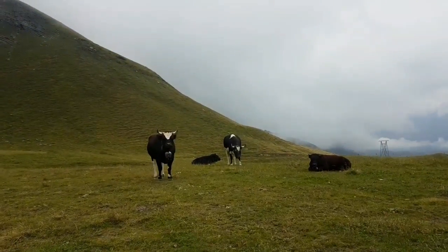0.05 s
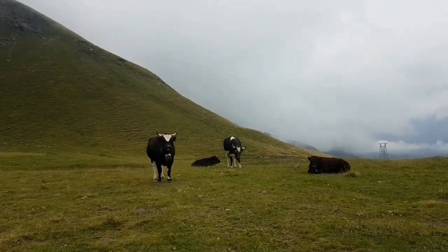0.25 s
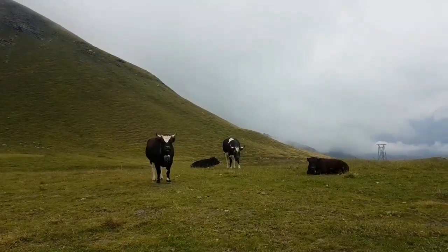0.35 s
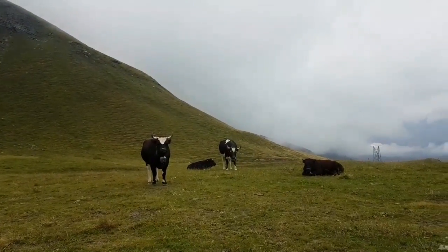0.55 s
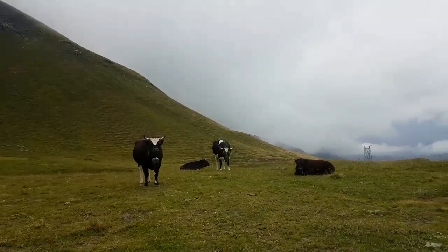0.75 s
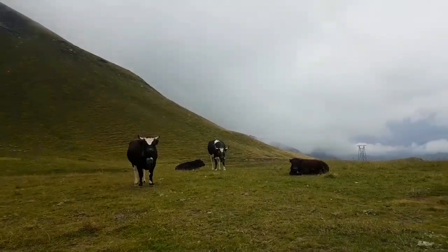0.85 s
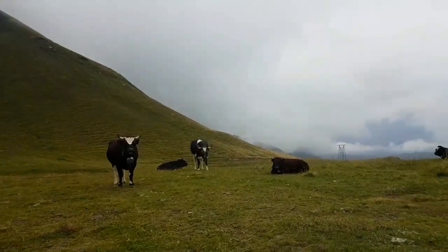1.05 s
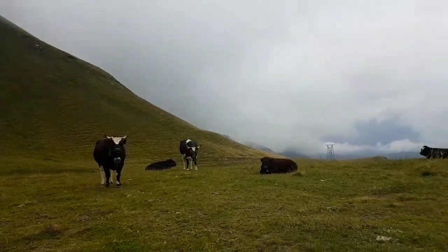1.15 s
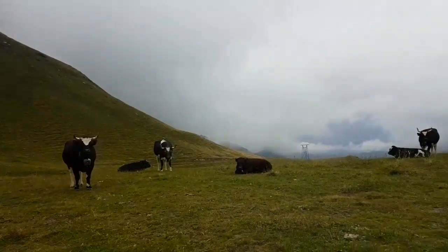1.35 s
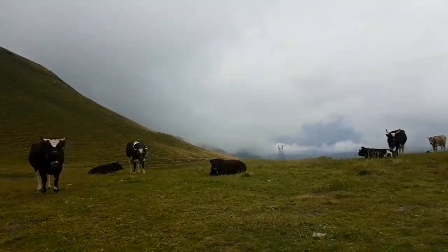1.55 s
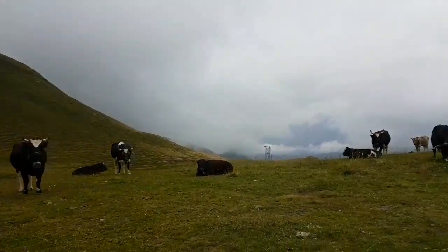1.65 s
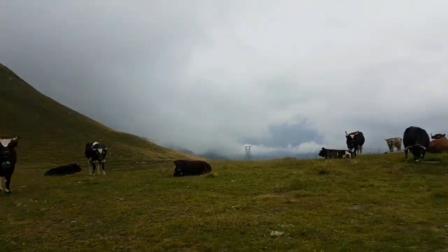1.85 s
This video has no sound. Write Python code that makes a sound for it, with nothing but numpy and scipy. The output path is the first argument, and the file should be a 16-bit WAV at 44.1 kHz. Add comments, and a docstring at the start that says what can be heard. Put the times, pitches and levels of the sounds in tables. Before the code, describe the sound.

Cowbells clank close by, a quick run then slower strokes, over light wind.

```python
"""A distant cowbell and a light wind rumbling on the microphone open a stereo scene on a mountain pasture.
Close by, a cow shakes her sheet-metal bell in a quick run of clanks; two more bells swing at a walking
pace and the herd answers from far off. Each clapper blow cracks against the wall and sets it ringing,
with close pairs of modes that beat and a shimmer of short high ones."""
import sys
import numpy as np
from scipy import signal
from scipy.fft import rfft, irfft
from scipy.io import wavfile

SR = 44100
rng = np.random.default_rng(int(sys.argv[2]) if len(sys.argv) > 2 else 0)


def log_audio(samples):
    """Write samples as a 16-bit WAV file to the path given in sys.argv[1]."""
    # one column per channel
    frames = np.atleast_2d(samples).T
    # limit to full scale, then quantise
    limited = np.clip(frames, -1, 1)
    pcm = np.round(limited * 32767).astype(np.int16)
    wavfile.write(sys.argv[1], SR, pcm)


N = 83790
T = np.arange(N) / SR
SWELL_CYCLES = 1.1  # time constant of a hum's build-up, in its own periods


def from_db(db):
    """Decibels to amplitude."""
    return 10 ** (np.asarray(db) / 20)


def at_hz(points, hz):
    """Reads a spectrum (f/Hz, level/dB) on a log-frequency axis."""
    points = np.array(points)
    return np.interp(np.log(hz), np.log(points[:, 0]), points[:, 1])


def noise(spectrum):
    """Coloured noise, unrelated in the two channels; rms 1."""
    gain = from_db(at_hz(spectrum, np.fft.rfftfreq(N, 1 / SR) + 1))
    x = irfft(rfft(rng.standard_normal((2, N))) * gain, N)
    return x / x.std()


def ring(times, sizes, hz, t60, pan_db, lag_s, swell_s=0):
    """One mode, each blow adding to its ring; the left channel is pan_db louder and lag_s later."""
    pole = (2j * np.pi * hz - np.log(1000) / max(t60, .01)) / SR
    at = np.clip(np.asarray(times) * SR, 0, N - 2)
    first = np.ceil(at).astype(int)
    blows = np.zeros(N, complex)
    blows[first] = sizes * np.exp(pole * (first - at))  # blows land between samples
    mode = signal.lfilter([1], [1, -np.exp(pole)], blows + 1e-18)
    if swell_s > 0:
        keep = np.exp(-1 / (swell_s * SR))
        for _ in range(2):  # the hum builds up smoothly as the air in the bell follows the wall
            mode = signal.lfilter([1 - keep], [1, -keep * np.exp(pole)], mode)
    left = from_db(pan_db / 2) * np.exp(-1j * np.pi * hz * lag_s)
    return np.array([(mode * left).imag, (mode / left).imag])


def far_bells(overtone_t60_s=.53, ting_t60_s=.18, ting_db=-9.5):
    """The herd far across the pasture: distance leaves each bell's hum, one overtone and a faint ting."""
    # blows: t/s, level/dB, hum f/Hz, hum t60/s, overtone f/Hz, overtone level/dB re hum
    blows = [(0, -39.5, 932, 0.21, 1820, -9), (.191, -32.5, 776, 0.17, 1975, -13),
             (0.66, -46, 982, 0.39, 943, -9.5), (.70, -37, 730, 0.07, 1975, -13),
             (.822, -43, 666.5, 0.36, 1842, -11), (1.002, -52, 982, 0.37, 967, 3),
             (1.253, -44, 661.5, 0.28, 1835, -1.5), (1.366, -46, 933, 0.075, 982, -15),
             (1.667, -43, 657, 0.5, 1810, -12), (1.725, -43, 793, 0.29, 1934, -4.5)]
    # upper modes as multiples of the hum
    ting_ratios = [3.2, 3.7, 7.3]
    out = 0
    for s, db, hz, t60, overtone_hz, overtone_db in blows:
        lag_s = rng.uniform(-0.00067, 0.00031)
        out += ring([s], from_db(db), hz, t60, 0, lag_s, SWELL_CYCLES / hz)
        out += ring([s], from_db(db + overtone_db), overtone_hz, overtone_t60_s, 0, lag_s)
        for ratio in ting_ratios:
            out += ring([s], from_db(db + ting_db), hz * ratio, ting_t60_s, 0, lag_s)
    return out


def wind(air_db=-56.5):
    """Wind on the microphone: an uneven rumble with two soft bumps, over the even hiss of open air."""
    # course of the rumble, and its bumps: t/s, level/dB
    gusts = [(0.0, -51), (0.206, -46), (0.254, -56), (0.492, -43.5), (1.084, -57), (1.174, -94),
             (1.466, -54.5), (1.554, -87), (1.814, -73), (1.9, -55)]
    bumps = [(1.442, -46), (1.793, -37)]
    # spectral densities: f/Hz, level/dB
    rumble_spectrum = [(25, -1), (55, 2), (110, 3.5), (180, -4.5), (300, -12.5), (600, -5.5), (1500, -39)]
    air_spectrum = [(30, 0), (200, -4), (600, -5), (1000, -10), (3000, -11), (6000, -20), (10000, -28),
                    (15000, -30)]
    level = from_db(np.interp(T, *np.transpose(gusts)))
    level += sum(from_db(db) * np.exp(-((T - s) / 0.0033) ** 2) for s, db in bumps)
    return level * noise(rumble_spectrum) + from_db(air_db) * noise(air_spectrum)


def struck_metal(blows, modes, lag_s):
    """Neighbouring modes start in opposite phase, close pairs beat; where a blow lands weights each."""
    # centres of the hum, clang, ring, ping and treble registers: f/Hz
    registers = [500, 2360, 3600, 4800, 6100]
    out, times = 0, [blow[0] for blow in blows]
    for k, (hz, db, t60, pan_db) in enumerate(modes):
        sign = (-1) ** k
        register_db = np.array([at_hz(list(zip(registers, blow[1:6])), hz) for blow in blows])
        bias_db = np.array([sum(blow[7:]) for blow in blows])  # 0 without a bias column
        sizes = sign * from_db(db + register_db + sign * bias_db)
        swell_s = SWELL_CYCLES / hz if hz < 1000 else 0
        out += ring(times, sizes, hz, t60, pan_db, lag_s, swell_s)
    return out


def shimmer(blows, level_db, count):
    """Many short high modes of the wall, some strong, some weak, each excited differently by every blow."""
    # envelope of the upper modes: f/Hz, level/dB
    spectrum = [(4000, -28), (5500, -2), (7000, 3.5), (9000, -15.5), (11000, -7.5), (13500, -12),
                (15000, -15)]
    out, blows = 0, np.array(blows)
    for hz in np.linspace(4300, 14500, count) + rng.uniform(-110, 110, count):
        scatter_db = rng.normal(0, 4.5) + rng.normal(0, 3, len(blows))  # per mode, per blow
        signs = rng.choice([-1, 1], len(blows))
        sizes = signs * from_db(level_db + at_hz(spectrum, hz) + blows[:, 6] + scatter_db)
        out += ring(blows[:, 0], sizes, hz, t60=.32 * np.sqrt(7000 / hz),
                    pan_db=rng.normal(0, 4), lag_s=rng.uniform(-0.51, 0.94) / hz)
    return out


def clack(blows, level_db, crack_t60_s=.013, rattle_t60_s=.44, rattle_db=-5):
    """The clapper meets the wall with a short crack and a fainter rattle."""
    # spectral density of the contact: f/Hz, level/dB
    spectrum = [(300, 4), (900, -83), (1300, 3), (1800, 2), (2500, 4.5), (3100, -0.5), (5000, -2.5),
                (8000, -12.5), (14000, -18.5)]
    power = 0
    for blow in blows:
        age = np.maximum(T - blow[0], 0)
        decay = from_db(-60 * age / crack_t60_s) + from_db(rattle_db - 60 * age / rattle_t60_s)
        size = from_db(level_db + np.mean(blow[2:7]))
        power += (T >= blow[0]) * (size * decay) ** 2
    return np.sqrt(power) * noise(spectrum)


def knock(blows, lag_s):
    """The small clapper rings briefly itself and radiates no bass."""
    # clapper modes: f/Hz, level/dB, t60/s, left minus right/dB
    modes = [(1445, -16.5, 0.064, 3), (1830, -8.5, 0.018, -2), (2020, -11, 0.008, -4),
             (2500, -8, 0.0073, 8), (3930, -16, 0.034, -8)]
    low_cut = signal.butter(4, 1250, "high", fs=SR, output="sos")
    return signal.sosfilt(low_cut, struck_metal(blows, modes, lag_s))


def near_bell(lag_s=.00002):
    """A cow shakes her bell right by the microphone, close enough to hear the clapper's own knock."""
    # blows: t/s, level/dB of hum, clang, ring, ping, treble, shimmer, bias/dB (even modes up, odd down)
    blows = [(.0698, -40, -47.5, -41.5, -53, -53, -50.5, 6.5),
             (.21501, -20.5, -28.5, -36, -43, -56, -44, -5),
             (.27685, -18.5, -28, -20.5, -35, -42.5, -44, 4.5),
             (.38437, -19, -30.5, -23, -35, -42.5, -41, -1), (.48737, -19, -30, -26, -31.5, -47, -45, 6),
             (.61153, -21.5, -26, -52, -54, -38, -43, 1.5), (.73094, -27, -25, -30, -73, -29.5, -47, -0.5),
             (.83265, -66, -31, -35.5, -76, -42, -54, -1), (.91862, -37, -36, -91, -42.5, -55, -59.5, -5),
             (.94417, -52, -39, -35, -66, -47, -51.5, 6), (1.00637, -41.5, -36, -39, -76, -47, -49, -0.5),
             (1.0657, -42, -85, -37, -45, -49, -68, -1), (1.173, -97, -68, -71, -52, -91, -60.5, -8),
             (1.2531, -68.5, -68.5, -69.5, -71, -73, -58.5, -15.5),
             (1.654, -74, -75, -96, -59, -76, -61.5, 7)]
    # wall modes: f/Hz, level/dB, t60/s, left minus right/dB
    modes = [(492, 0, .62, 0), (511, -1, .57, 0), (1278, -19, 1.1, 1), (1325, -19, 1.67, 1),
             (2341, 0, 1.75, 0), (2386, -2, 1.15, 0), (3561, -6, .83, -1), (3665, 1, .89, -1.5),
             (6061, 0, .14, 3), (6193, -1, .2, 3), (4802, -4, .36, -5), (306, -28, .7, 0),
             (326, -29, .6, 0), (2480, -8, .04, 0), (7763, -11, .22, 0), (8177, -12, .2, 0)]
    wall = struck_metal(blows, modes, lag_s) + shimmer(blows, level_db=-8.5, count=60)
    return wall + clack(blows, level_db=3) + knock(blows, lag_s)


def walking_bell():
    """The bell of a cow walking nearby swings against its clapper about twice a second."""
    # blows: t/s, level/dB of hum, clang, ring, ping, treble, shimmer
    blows = [(.0698, -36, -28.5, -27.5, -43, -34, -29.5), (.5295, -28.5, -29, -16, -56.5, -45, -24),
             (1.0235, -33, -22.5, -45.5, -34, -33.5, -32.5),
             (1.4755, -29.5, -26.5, -40.5, -24.5, -26, -34.5)]
    # wall modes: f/Hz, level/dB, t60/s, left minus right/dB
    modes = [(582.6, -8, 1.85, -0.5), (599.8, 6, 0.36, -0.5), (1518, -18.5, 3.25, 5),
             (1574.5, -26.5, 0.81, 20.5), (2783.4, -16.5, 1.85, -11), (2836, -14.5, 0.93, -2.5),
             (4200, -2.5, 0.75, 1), (4371, -9, 0.41, -4), (5600, -37, 0.51, -30), (7010, -25.5, 0.31, -24),
             (9960, -17.5, 0.076, 2), (11700, -26, 0.14, -12)]
    wall = struck_metal(blows, modes, lag_s=.00033) + shimmer(blows, level_db=-25.5, count=24)
    return wall + clack(blows, level_db=-17)


def small_bell():
    """A smaller, higher bell nearby swings a little faster."""
    # blows: t/s, level/dB of hum, clang, ring, ping, treble, shimmer
    blows = [(.291, -34, -40, -52, -44, -34, -30), (.637, -33, -46.5, -32.5, -32, -39, -26),
             (1.026, -34, -42.5, -37, -33, -36.5, -49), (1.399, -29, -38.5, -34, -33.5, -36, -38),
             (1.7855, -25.5, -42, -33, -37, -31, -30.5)]
    # wall modes: f/Hz, level/dB, t60/s, left minus right/dB
    modes = [(743, 3, .14, 2), (1898, 2, .28, 1), (2073, -18, .5, 0), (3183, -11, 1.5, -2),
             (3486, -11, .5, 0), (4689, -23, .4, 0), (5383, -17, .12, 0), (5658, -19, .2, 0),
             (6525, -17, .35, 0), (6690, -22, .4, 0), (7730, -16, .22, 0), (13090, -17, .13, 0)]
    wall = struck_metal(blows, modes, lag_s=.0004) + shimmer(blows, level_db=-25, count=16)
    return wall + clack(blows, level_db=-9)


def scene():
    """Three bells close by, the herd beyond, and wind on the microphone."""
    return near_bell() + walking_bell() + small_bell() + far_bells() + wind()


def record(dry):
    """The microphone signal is cut steeply above 14.9 kHz."""
    return signal.sosfilt(signal.ellip(10, .1, 80, 14900, fs=SR, output="sos"), dry)


dry = scene()
out = record(dry)
log_audio(out)
```